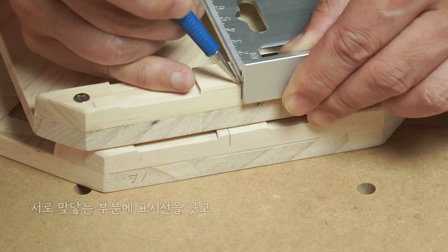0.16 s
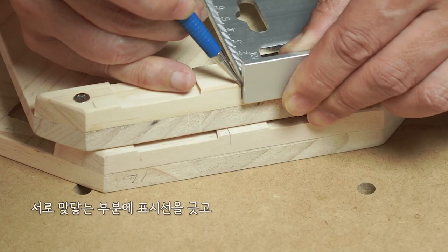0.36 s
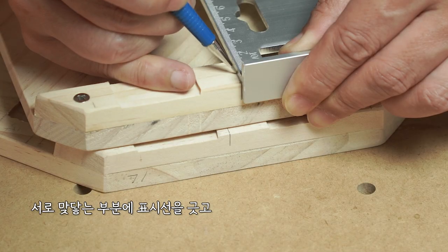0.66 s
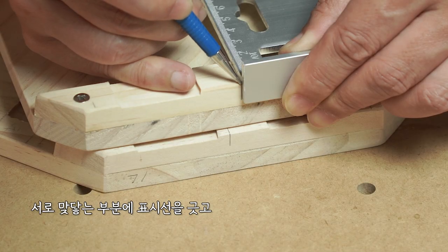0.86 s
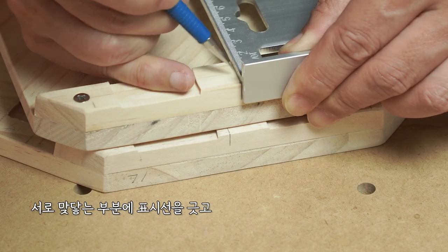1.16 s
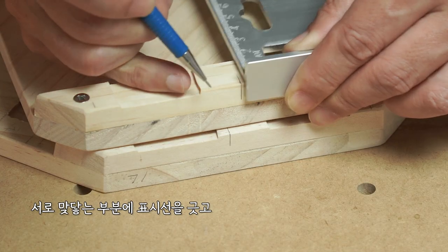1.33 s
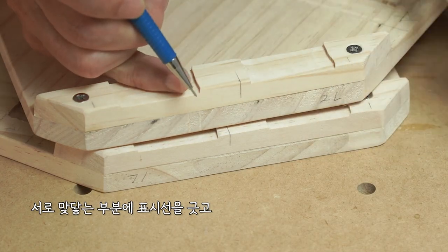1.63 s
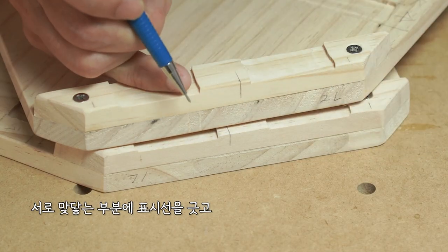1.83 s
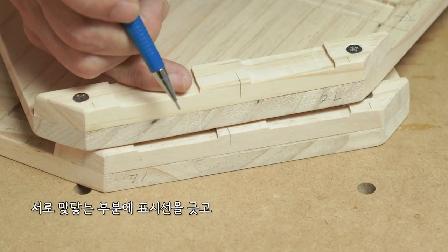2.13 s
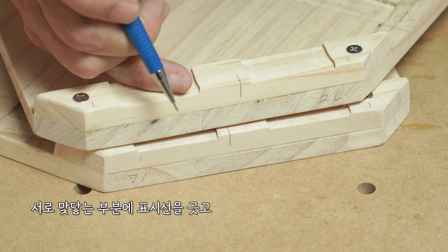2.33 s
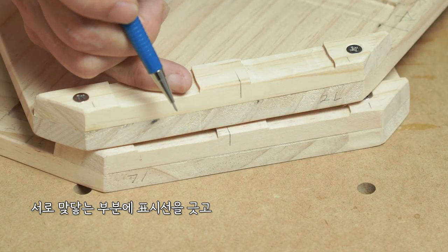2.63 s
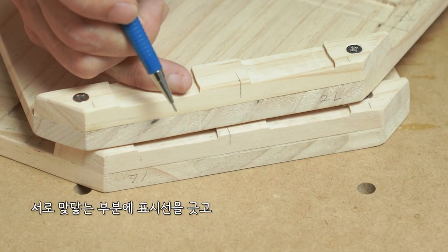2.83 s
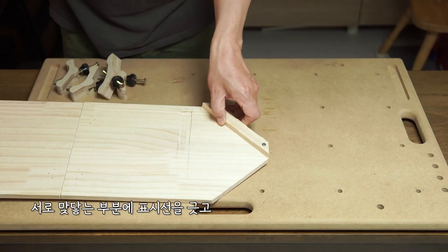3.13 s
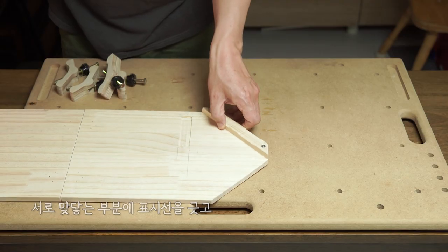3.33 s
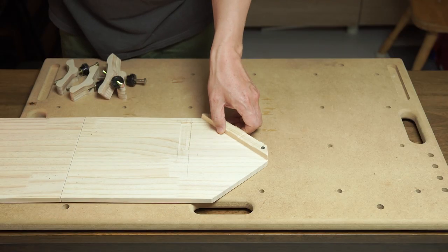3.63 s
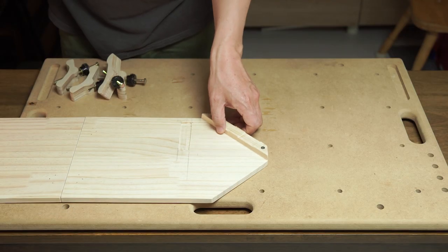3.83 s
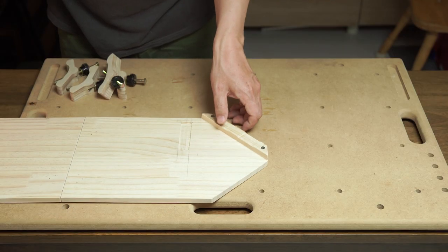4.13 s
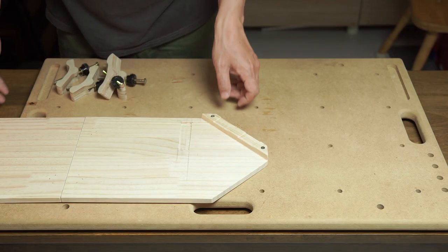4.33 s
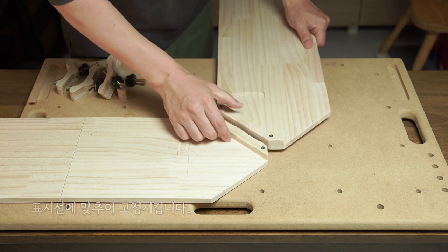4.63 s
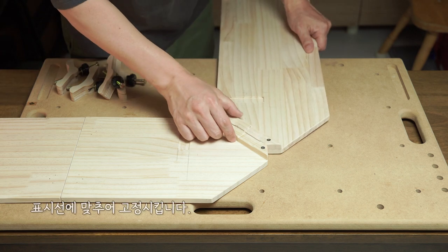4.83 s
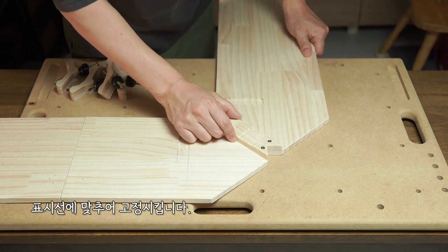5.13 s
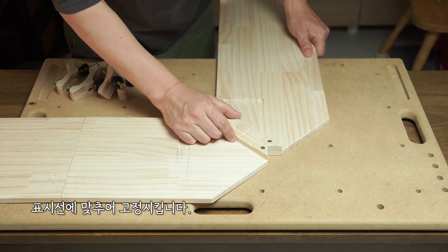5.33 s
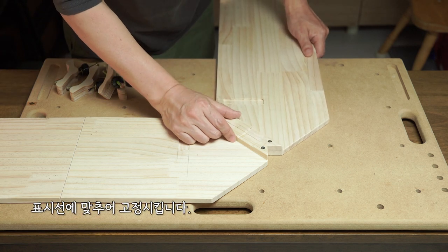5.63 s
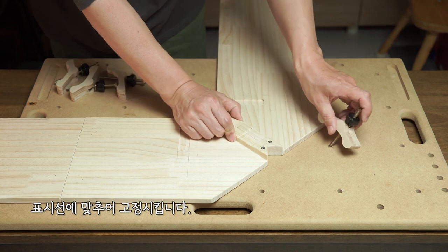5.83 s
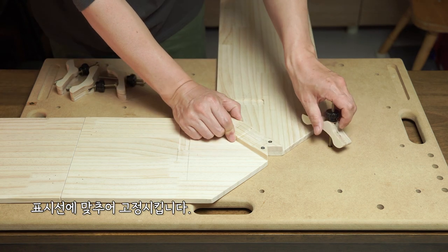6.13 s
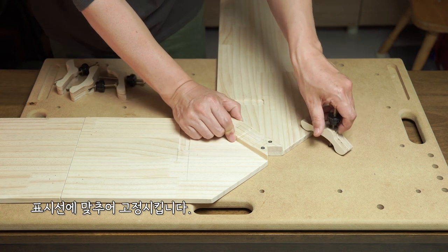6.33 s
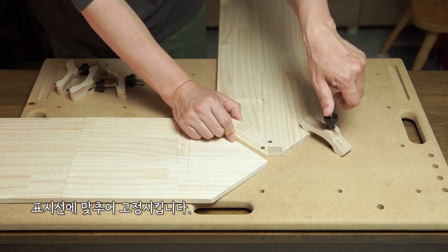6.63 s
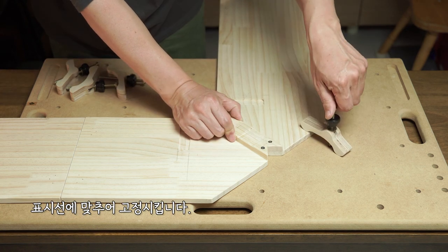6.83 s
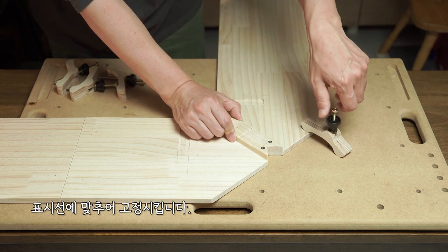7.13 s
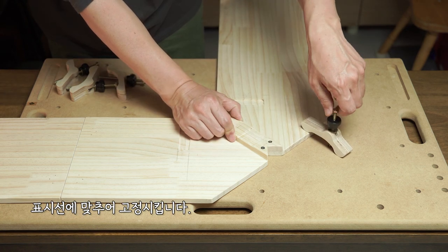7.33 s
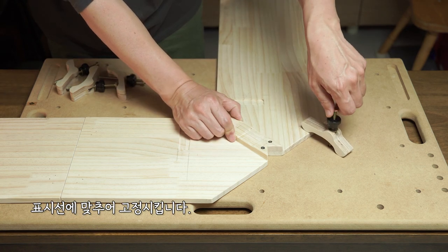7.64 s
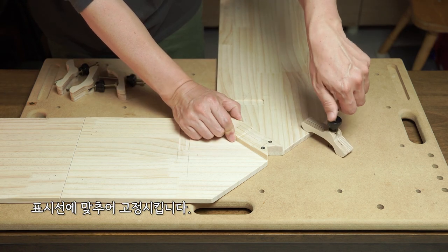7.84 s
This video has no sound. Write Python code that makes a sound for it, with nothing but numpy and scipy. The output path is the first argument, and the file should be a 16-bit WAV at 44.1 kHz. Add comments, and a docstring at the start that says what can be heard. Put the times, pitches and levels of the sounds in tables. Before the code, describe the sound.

Quiet woodworking in a small, lively workshop over faint steady hiss: light pencil ticks and a brief square scrape, then near silence. Two muffled knocks set down a pine panel; small dry ticks and soft bumps join another to it. Much louder, a wooden clamp's bolt clinks and clatters into the bench, slightly right, followed by knob taps and three swelling thread rattles, each stopped by a hard double clack. The microphone is close, with short echoes.

```python
"""A wooden hold-down clamp drops bolt first into a bench hole, and its knob is spun down the thread
in rattling turns. Before that a pencil marks a pine panel along a steel square, the panel is laid
down and a second one is butted against it. Knocks are short bursts of force and rubbing is a run of
tiny slips; both make an object's resonances ring. A small, live workshop adds echoes over faint hiss."""
import sys
import numpy as np
from scipy import signal
from scipy.fft import rfft, irfft
from scipy.io import wavfile
from scipy.ndimage import uniform_filter1d

SR = 44100
rng = np.random.default_rng(int(sys.argv[2]) if len(sys.argv) > 2 else 0)


def master_out(mix):
    """Clip the mix to full scale and print it as 16-bit PCM to the path in sys.argv[1]."""
    frames = np.transpose(np.atleast_2d(mix))
    ceiling = np.clip(frames, -1, 1)
    pcm = np.round(ceiling * 32767).astype(np.int16)
    wavfile.write(sys.argv[1], SR, pcm)


N = 351427

SIZE = 2 ** 15   # samples in every impulse response
TIME = np.arange(SIZE) / SR
HZ = np.maximum(np.arange(SIZE // 2 + 1) * SR / SIZE, 1)   # no zero, so that its logarithm exists
CUTOFF_HZ = 15700   # top of the whole sound
BENCH_CUT_HZ = 1750   # contact cut-off of every force on the bench top

# In every table, colours and modes are relative levels; a layer's own trim comes on top of its levels.
# broad colour of the bench top: (f/Hz, level/dB)
BENCH_TOP_COLOUR = [(40, -37.5), (200, -34.5), (400, -29), (490, -20.5), (580, -3), (850, 10.5), (1250, 4),
                    (1600, -32.5), (5000, -35)]


def from_db(db):
    """Turn decibels into a gain."""
    return 10 ** (np.asarray(db) / 20)


def unit_energy(x):
    """Scale a response so that it passes white noise at the same power."""
    return x / np.sqrt(np.sum(x ** 2) + 1e-20)


def at_hz(points, hz=HZ):
    """Read a table between its points, along a log-frequency axis."""
    freqs, values = np.transpose(points)
    return np.interp(np.log(hz), np.log(freqs), values)


def causal(gain_db):
    """Minimum-phase impulse response of a gain curve: nothing sounds before the blow."""
    cepstrum = irfft(np.log(from_db(gain_db)))
    # fold the half before time zero onto the half after it
    cepstrum[1:SIZE // 2] *= 2
    cepstrum[SIZE // 2 + 1:] = 0
    return irfft(np.exp(rfft(cepstrum)))


def through(x, response):
    """Pass a signal through an impulse response."""
    return signal.fftconvolve(x, response)[:len(x)]


def evened(response, width_hz):
    """Take the broad colour out of a response; its course in time stays."""
    width_bins = max(1, round(width_hz * SIZE / SR))
    power = uniform_filter1d(np.abs(rfft(response)) ** 2, width_bins)
    return through(response, causal(-10 * np.log10(power + 1e-12)))


def body(colour, modes=()):
    """Ring of an object: a broad colour with resonant peaks on top."""
    peaks_db = sum(db / (1 + (2 * (HZ - hz) / width) ** 2) for hz, width, db in modes)
    return unit_energy(causal(at_hz(colour) + peaks_db))


def soften(x, cut_hz):
    """A soft contact lasts longer and so holds less treble."""
    low_pass = signal.butter(4, min(cut_hz, SR / 2 - 1000), fs=SR, output="sos")
    return signal.sosfilt(low_pass, x + 1e-18)


def grains(count, spread_db):
    """Tiny collisions of uneven strength, rms 1."""
    strength_db = spread_db * np.clip(rng.standard_normal(count), -2, 2)
    x = rng.standard_normal(count) * from_db(strength_db)
    return unit_energy(x) * np.sqrt(count)


def background():
    """Faint, even hiss of the quiet room: coloured noise, partly different on the two sides."""
    # colour of the hiss: (f/Hz, level/dB)
    hiss_colour = [(59, -64), (100, -39.5), (173, -25.5), (394, -14.5), (576, -11.5), (955, -5),
                   (1280, -1.5), (1760, -1), (2220, -0.5), (3180, -4.5), (3530, -8.5), (4000, -10),
                   (4360, -11), (11500, -19.5), (15400, -21.5)]
    # difference between the two sides, against the middle: (f/Hz, level/dB)
    hiss_side = [(300, -7.5), (2000, -4.5), (5000, -3.5), (10000, -1.5)]
    hiss_db = -62
    mid, side = [through(noise, body(hiss_colour)) for noise in rng.standard_normal((2, N))]
    side = through(side, causal(at_hz(hiss_side)))
    return from_db(hiss_db) * np.array([mid + side, mid - side])


def strokes(table, attack_share):
    """Pressure of hand strokes: each builds to its peak and lets go."""
    t = np.arange(N) / SR
    share = np.clip(attack_share, .05, .95)
    pressure = np.zeros(N)
    for peak_s, db, length_s in table:
        # the length spans the points 20 dB below the peak
        distance = np.maximum((peak_s - t) / share, (t - peak_s) / (1 - share)) / length_s
        pressure += from_db(db - 20 * distance)
    return pressure


def rubbing(pressure, ring, slips_per_s, cut_hz, grit):
    """Surfaces catch and slip at uneven intervals, over a finer grit; pressure sets the level."""
    intervals = rng.uniform(.2, 1.8, N // 10)   # in average intervals
    moments = (np.cumsum(intervals) * SR / slips_per_s).astype(int)
    slips = np.zeros(N)
    slips[moments[moments < N]] = 1
    slips *= from_db(2 * rng.standard_normal(N)) * rng.choice([-1, 1], N)   # uneven strength and sign
    fine_grit = grit * unit_energy(rng.standard_normal(N))
    force = unit_energy(unit_energy(slips) + fine_grit) * np.sqrt(N)
    return through(force * pressure, unit_energy(soften(ring, cut_hz)))


def marking():
    """The pencil scratches along the square, then the square slides away: two kinds of rubbing."""
    # strokes of the pencil lead: (t of firmest pressure/s, level/dB, length/s)
    pencil_strokes = [(.615, -38, 0.066), (.787, -49, 0.079), (1.055, -37, 0.06), (1.15, -51.5, 0.13)]
    # pushes of the square off the panel: (t of firmest pressure/s, level/dB, length/s)
    square_slide = [(1.355, -53.5, 0.085), (1.418, -52, 0.095)]
    # broad colours of both: (f/Hz, level/dB)
    pencil_colour = [(120, -103), (200, -47), (479, -15.5), (564, 5), (811, -11.5), (1210, 3), (1430, -7),
                     (1770, 3), (1980, -10.5), (2900, -4), (5000, -19.5), (7600, -19.5), (15400, -44)]
    square_colour = [(150, -55), (400, -7), (1000, 2), (2500, 11.5), (3800, -3), (4800, 3), (6000, -7.5),
                     (15000, -25)]
    # resonances under the pencil: (f/Hz, width/Hz, level/dB)
    pencil_modes = [(554, 65, -3), (1060, 60, -0.5), (1180, 60, -2), (3030, 270, 5.5)]

    pencil = rubbing(strokes(pencil_strokes, attack_share=0.28), body(pencil_colour, pencil_modes),
                     slips_per_s=1000, cut_hz=17000, grit=0.18)
    square = rubbing(strokes(square_slide, attack_share=0.56), body(square_colour),
                     slips_per_s=430, cut_hz=16000, grit=0.67)
    return pencil + square


def echoes(build_s, hold_s):
    """Reflections build up, hold while they cross the room, then die band by band."""
    # time the ring takes to fall by 60 dB: (f/Hz, t60/s)
    room_t60 = [(150, 0.23), (550, 0.2), (1400, 0.26), (3700, 0.26), (9000, 0.23), (15000, 0.16)]
    spectrum = rfft(grains(SIZE, spread_db=7.5))
    centres = np.geomspace(100, 16000, 9)   # Hz
    out = np.zeros(SIZE)
    for hz, share in zip(centres, np.eye(len(centres))):
        band = irfft(spectrum * np.interp(np.log(HZ), np.log(centres), share))
        dying_s = np.maximum(TIME - hold_s, 0)
        out += band * np.exp(-np.log(1000) * dying_s / at_hz(room_t60, hz))
    return unit_energy(out * (1 - np.exp(-TIME / build_s)))


def workshop(x, wet_db):
    """Direct sound and echoes, even in colour overall; the treble spreads wider than the middle."""
    # difference between the two sides: (f/Hz, level/dB)
    room_side = [(120, -7.5), (280, -18.5), (550, -17), (2000, -13), (4500, -8), (9000, -4), (14000, 0)]
    mid, side = [from_db(wet_db) * echoes(build_s=0.00074, hold_s=0.018) for _ in range(2)]
    mid[0] += 1   # direct sound
    mid = evened(mid, width_hz=88)
    side = through(evened(side, width_hz=220), causal(at_hz(room_side)))
    return np.array([through(x, mid + side), through(x, mid - side)])


def strikes(table, ring, click, settle_s, level_db):
    """Each blow is a click and a chatter that swells and dies as the faces settle."""
    out = np.zeros(N + SIZE)
    for s, db, cut_hz in table:
        chatter = grains(SIZE, spread_db=3) * TIME * np.exp(-TIME / settle_s)
        force = unit_energy(chatter)
        force[0] += click
        contact = soften(evened(force, width_hz=1600), cut_hz)
        blow = unit_energy(through(contact, ring))
        start = round(s * SR)
        # a blow's level is its energy as an rms over a hundredth of a second
        out[start:start + SIZE] += from_db(db + level_db) * np.sqrt(SR / 100) * blow
    return out[:N]


def panels():
    """Pine panels knock, flex, tick and slide on the bench; the slides and joint knocks share one ring."""
    # first panel on the bench: (t/s, level/dB, contact cut-off/Hz)
    panel_knocks = [(3.116, -25, 4300), (3.472, -50, 2980), (3.526, -24.5, 2590), (3.537, -29.5, 2050),
                    (3.582, -37.5, 2200)]
    # whole panel flexing slowly after a heavy knock: (t/s, level/dB, contact cut-off/Hz)
    panel_thumps = [(3.124, -48, 764), (3.541, -33.5, 1020), (4.899, -41.5, 643), (4.985, -45, 950)]
    # panels nudged into place: (t of firmest pressure/s, level/dB, length/s)
    panel_slide = [(3.22, -52, 0.36), (3.49, -58, 0.24), (3.622, -46, .11), (4.905, -53, 0.053),
                   (4.96, -46.5, 0.078), (5.075, -53.5, 0.22), (5.28, -64, 0.36), (5.925, -56.5, 0.12)]
    # dry ticks as the panels are handled: (t/s, level/dB, contact cut-off/Hz)
    dry_ticks = [(3.6, -60.5, 6000), (4.522, -40, 13900), (4.534, -43, 12000)]
    # second panel butting against the first: (t/s, level/dB, contact cut-off/Hz)
    joint_knocks = [(4.851, -46.5, 2600), (4.884, -42, 2800), (4.897, -34, 2420), (4.977, -37, 2090),
                    (5.085, -54, 3200)]
    # broad colours of knock, flexing, slide with joint, and tick: (f/Hz, level/dB)
    panel_colour = [(60, -54), (150, -41), (260, -29.5), (450, -27), (800, -6.5), (1000, -1), (1250, 6.5),
                    (1550, 0.5), (1800, -4.5), (2500, -10.5), (3400, -20), (5000, -37), (12000, -70)]
    thump_colour = [(60, -45), (130, -39), (200, -23), (270, -10.5), (345, -13), (420, 6), (500, -2),
                    (600, -9.5), (900, 9.5), (1300, -9), (3000, -54)]
    slide_colour = [(71, -79), (120, -49), (430, -15.5), (547, -9.5), (838, -9), (989, -2), (1430, -8.5),
                    (1690, 2), (2740, -2), (5230, -5.5), (10000, -11), (13000, -104), (22000, -120)]
    tick_colour = [(180, -87), (300, -53), (552, -25), (743, -27), (891, -11), (1490, -22), (1750, -2),
                   (3930, -7), (5650, 2), (15400, -17.5)]
    # resonances of the first panel, and of slide with joint: (f/Hz, width/Hz, level/dB)
    panel_modes = [(280, 16, 16.5), (402, 26, 3.2), (590, 74, 17.7), (1130, 110, 4.4), (1440, 150, 3),
                   (1796, 105, 13.3)]
    joint_modes = [(280, 49, 4), (410, 20, 5.1), (1010, 150, 1.5), (1230, 220, 11)]

    slide_and_joint_ring = body(slide_colour, joint_modes)
    knocks = strikes(panel_knocks, body(panel_colour, panel_modes),
                     click=0.35, settle_s=0.0022, level_db=1.0)
    thumps = strikes(panel_thumps, body(thump_colour), click=0.059, settle_s=0.0018, level_db=0.5)
    slide = from_db(2) * rubbing(strokes(panel_slide, attack_share=0.58), slide_and_joint_ring,
                                 slips_per_s=210, cut_hz=2960, grit=0.44)
    ticks = strikes(dry_ticks, body(tick_colour), click=0.16, settle_s=0.0034, level_db=1.5)
    joint = strikes(joint_knocks, slide_and_joint_ring, click=1.0, settle_s=0.0013, level_db=-0.5)
    return knocks + thumps + slide + ticks + joint


def clamp_drop():
    """The steel bolt clinks into its hole, drumming on the bench top, and the wooden arm lands."""
    # bolt on the rim of the hole: (t/s, clink level/dB, contact cut-off/Hz, bench level/dB)
    bolt_clinks = [(5.945, -34, 14600, -55.5), (5.953, -29.5, 13800, -47.5), (5.968, -23.5, 9150, -32),
                   (5.982, -19, 15900, -42.5), (6.256, -53.5, 14000, -36.5), (6.275, -51.5, 14000, -35.5),
                   (6.302, -23.5, 6940, -25), (6.329, -21.5, 8000, -24), (6.346, -18.5, 9600, -23),
                   (6.362, -16, 14000, -29)]
    # arm of the clamp landing: (t/s, level/dB, contact cut-off/Hz)
    arm_knocks = [(6.346, -3, 8800), (6.350, -7.5, 5070), (6.362, -7.5, 5500), (6.369, -17, 4000)]
    # broad colours of bolt and arm: (f/Hz, level/dB)
    bolt_colour = [(200, -42), (500, -32), (750, -11.5), (1500, -15.5), (3500, -13), (5500, -18.5),
                   (7400, -13), (8500, -5.5), (9400, -13), (11500, -23), (15500, -26)]
    arm_colour = [(40, -57.5), (250, -54), (440, -24.5), (560, -17.5), (1000, -6), (1400, -5.5), (1850, 2),
                  (2400, 2.5), (2900, -5), (3400, -7.5), (4500, -16.5), (7000, -20.5), (15000, -23)]
    # resonances of the bolt, and those shared by arm and bench top: (f/Hz, width/Hz, level/dB)
    bolt_modes = [(2480, 77, 6.5), (3530, 84, 5), (3566, 83, 6.9), (8820, 300, 5), (9330, 270, 8.6),
                  (13630, 230, 6), (13760, 12, 18.5)]
    clamp_modes = [(596, 69, 13), (706, 24, 2.6), (804, 14, 2.2), (916, 35, 4.8), (1063, 24, 3.1),
                   (1324, 76, 6.7), (1681, 50, 6.9), (1800, 26, 2.7), (1750, 42, 2.1), (2140, 30, 4),
                   (2345, 30, 5.6), (2350, 33, 4.3), (2700, 28, 2), (3530, 70, 6.5)]

    clinks = [(s, db, cut_hz) for s, db, cut_hz, _ in bolt_clinks]
    thuds = [(s, bench_db, BENCH_CUT_HZ) for s, _, _, bench_db in bolt_clinks]
    bolt = strikes(clinks, body(bolt_colour, bolt_modes), click=0.51, settle_s=0.0018, level_db=-2.5)
    bench = strikes(thuds, body(BENCH_TOP_COLOUR, clamp_modes),
                    click=.4, settle_s=0.0029, level_db=-1.0)
    arm = strikes(arm_knocks, body(arm_colour, clamp_modes), click=0.23, settle_s=0.0014, level_db=-.5)
    return bolt + bench + arm


def washer():
    """The washer jingles on the bolt: light, bright blows on a thin ring."""
    # jingles: (t/s, level/dB)
    washer_jingles = [(5.945, -52), (7.043, -35), (7.728, -47.5), (7.774, -39)]
    # broad colour: (f/Hz, level/dB)
    washer_colour = [(1000, -53), (6000, -12), (9000, -4), (10500, -1.5), (11500, -16.5), (15000, -36)]
    # resonance: (f/Hz, width/Hz, level/dB)
    washer_modes = [(11000, 130, 9.3)]
    jingles = [(s, db, CUTOFF_HZ) for s, db in washer_jingles]
    return strikes(jingles, body(washer_colour, washer_modes), click=.3, settle_s=0.0056, level_db=4.0)


def spin(grip_s, stop_s, db):
    """Force on the thread in one turn: it swells from the grip to the stop, then dies quickly."""
    swell_db_per_s, release_s = 113, .006
    t = np.arange(N) / SR
    swell = from_db(db - swell_db_per_s * np.maximum(stop_s - t, 0))
    return (t > grip_s) * swell * np.exp(-np.maximum(t - stop_s, 0) / release_s)


def dispersed(ring, spread_s):
    """Waves reach the air along many short paths, which smears each click a little."""
    paths = evened(grains(SIZE, spread_db=0.5) * np.exp(-TIME / spread_s), width_hz=290)
    return unit_energy(through(ring, paths))


def knob():
    """Each turn taps, grinds louder and louder, shaking the bench, then stops with knock and clack."""
    # turns down the thread: (grip t/s, stop t/s, grip level/dB, grip contact cut-off/Hz,
    # thread level at the stop/dB, bench level at the stop/dB, stop knock level/dB)
    knob_turns = [(6.896, 7.035, -36, 3080, -22.5, -32, -15.5), (7.26, 7.41, -23.5, 7100, -14.5, -40, -11),
                  (7.647, 7.766, -27, 6000, -17.5, -34.5, -11.5)]
    # knob knocking on the arm between and during turns; the last row is the grip of another turn:
    # (t/s, level/dB, contact cut-off/Hz)
    knob_knocks = [(6.625, -33, 5800), (6.759, -51.5, 2580), (6.993, -22, 3350), (7.350, -21.5, 4400),
                   (7.661, -22.5, 4030), (7.690, -21.5, 4380), (7.727, -16.5, 5500), (7.959, -25.5, 4530)]
    # broad colour: (f/Hz, level/dB)
    knob_colour = [(200, -73), (400, -85), (560, -31.5), (750, -22), (1000, -16), (1300, -9), (1750, 2),
                   (2400, 3), (3000, -3), (3500, -7), (4200, -6.5), (5500, -9), (8000, -18.5),
                   (11000, -40.5), (15500, -51)]
    # resonances: (f/Hz, width/Hz, level/dB)
    knob_modes = [(579, 18, 8.5), (890, 39, 2.64), (1036, 11, 1.6), (1247, 39, 10.6), (1515, 26, 3.7),
                  (1756, 110, 6.6), (1860, 19, 1.2), (2416, 74, 8.5), (2760, 116, 4.8), (2966, 160, 7.3),
                  (3457, 88, 6.4), (3960, 190, 7.4), (3960, 77, 2), (5650, 59, 2.8)]
    stop_hz, clack_hz = 4280, 12000   # contact cut-offs
    # after the stop the bolt takes up its play with a bright clack, a little below the knock
    clack_delay_s, clack_db = .0065, -2.5

    force, shake, blows = 0, 0, list(knob_knocks)
    for grip_s, stop_s, grip_db, grip_hz, thread_db, bench_db, stop_db in knob_turns:
        force = force + spin(grip_s, stop_s, thread_db)
        shake = shake + spin(grip_s, stop_s, bench_db)
        blows.append((grip_s, grip_db, grip_hz))
        blows.append((stop_s, stop_db, stop_hz))
        blows.append((stop_s + clack_delay_s, stop_db + clack_db, clack_hz))

    ring = body(knob_colour, knob_modes)
    knocks = strikes(blows, ring, click=0.089, settle_s=0.002, level_db=1.2)
    thread = rubbing(force, dispersed(ring, spread_s=0.0015), slips_per_s=150, cut_hz=3560, grit=0.38)
    bench = rubbing(shake, body(BENCH_TOP_COLOUR, knob_modes),
                    slips_per_s=150, cut_hz=BENCH_CUT_HZ, grit=0.65)
    return knocks + from_db(-4.5) * (thread + bench)


def scene():
    """Panels, falling clamp and knob each get their own echoes; the clamp sits a little to the right."""
    wood = workshop(marking() + panels(), wet_db=6.5) * from_db([[.2], [-.2]])   # left, right
    clamp = workshop(clamp_drop(), wet_db=5) + workshop(washer() + knob(), wet_db=4.0)
    return background() + wood + clamp * from_db([[-.5], [.5]])


def record(dry):
    """Peaks beyond full scale are flattened, then a steep low-pass cuts the top."""
    clipped = np.clip(dry, -1, 1)
    low_pass = signal.ellip(10, .1, 70, CUTOFF_HZ, fs=SR, output="sos")
    return signal.sosfilt(low_pass, clipped)


dry = scene()
out = record(dry)
master_out(out)
```